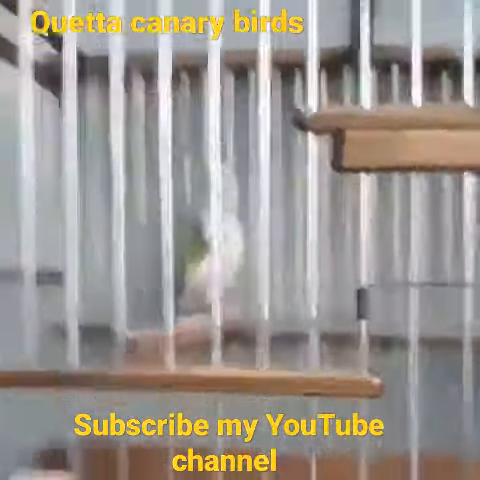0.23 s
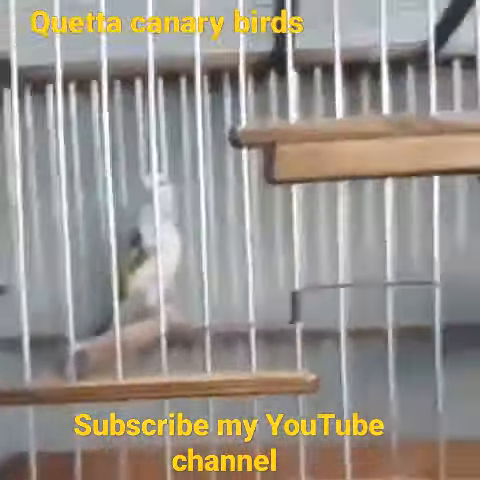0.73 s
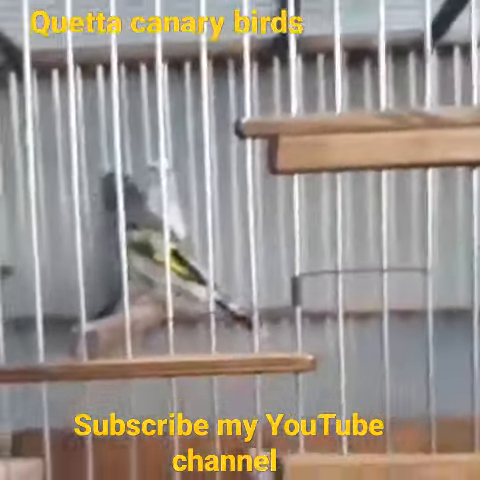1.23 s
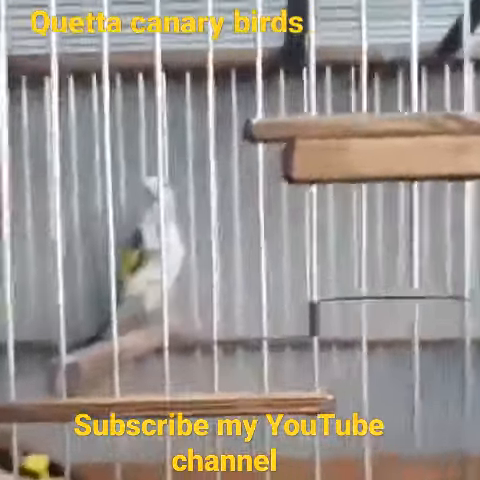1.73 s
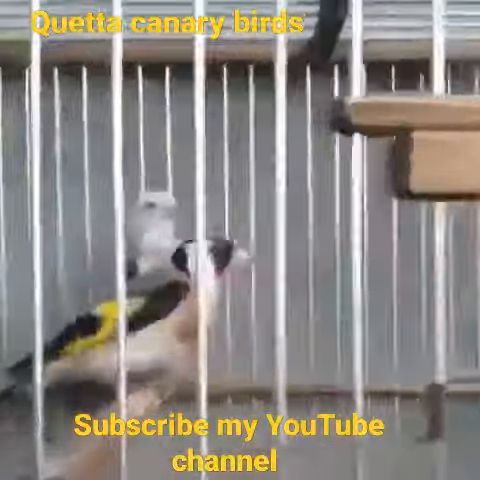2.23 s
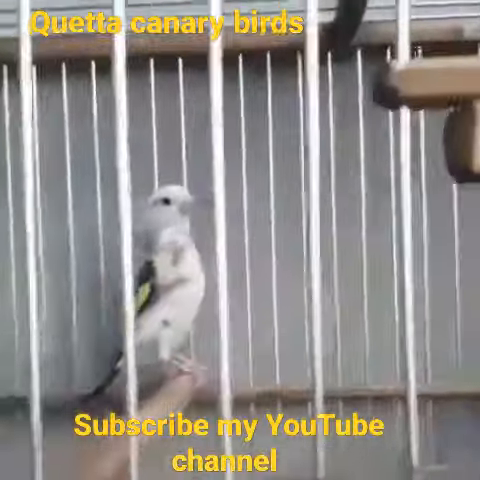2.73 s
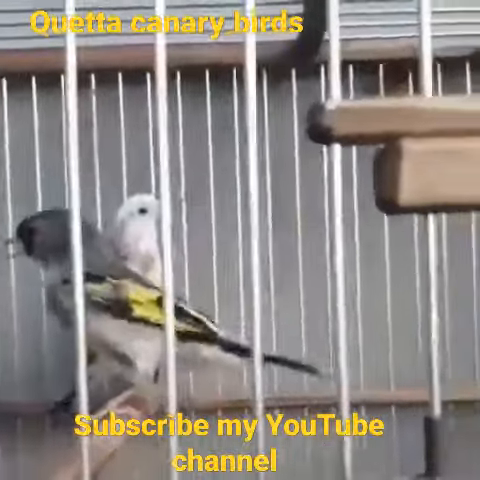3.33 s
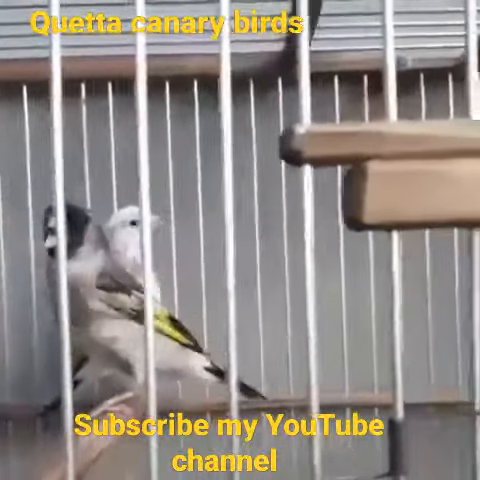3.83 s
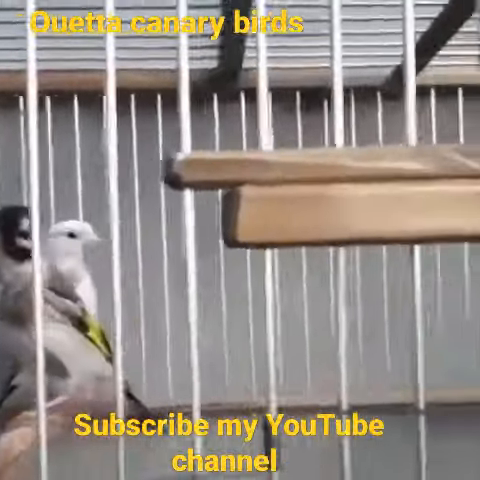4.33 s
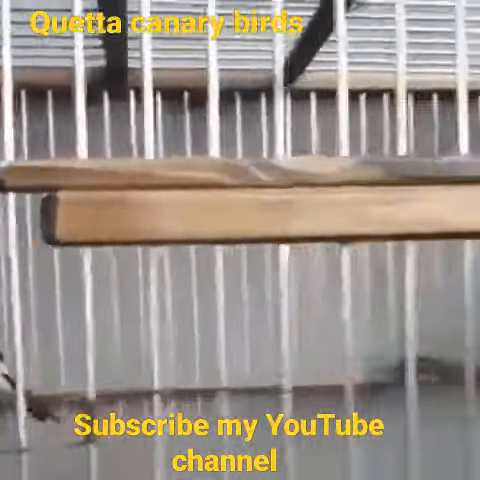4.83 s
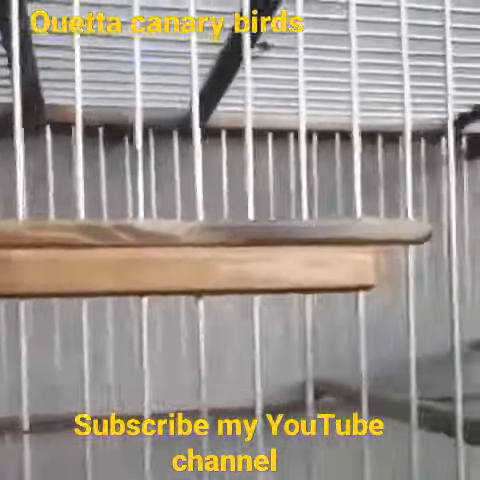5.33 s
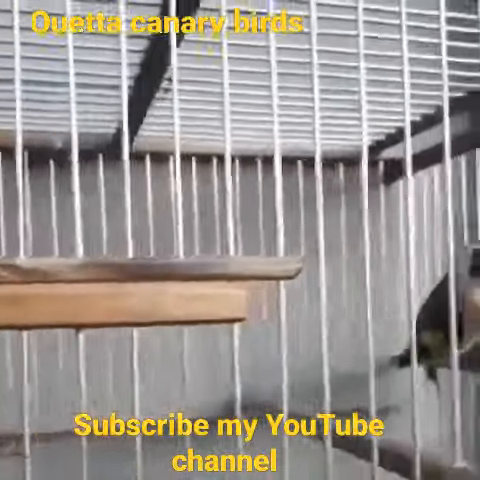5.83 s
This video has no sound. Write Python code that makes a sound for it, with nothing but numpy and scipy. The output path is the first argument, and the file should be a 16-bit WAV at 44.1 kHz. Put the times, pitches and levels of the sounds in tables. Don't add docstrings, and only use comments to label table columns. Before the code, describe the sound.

Sharp, high finch chips amid fluttering feathers, clicking cage wires and small wooden hops, with faint distant bird whistles in a room.

```python
import sys
import numpy as np
from scipy import signal
from scipy.fft import rfft, irfft
from scipy.io import wavfile
from scipy.ndimage import uniform_filter1d

SR = 44100
rng = np.random.default_rng(int(sys.argv[2]) if len(sys.argv) > 2 else 0)


def dump(signal):
    limited = np.clip(np.atleast_2d(signal).T, -1, 1)
    pcm = np.round(limited * 32767).astype(np.int16)
    wavfile.write(sys.argv[1], SR, pcm)


def voltage_ratio(level):
    return 10 ** (np.asarray(level, float) / 20)


N = 268524


def rms_one(x):
    return x / np.sqrt(np.mean(x ** 2) + 1e-20)


def in_time(s, length, rise_s, fall_s):
    corners = [s, s + rise_s, s + rise_s + length, s + rise_s + length + fall_s]
    return np.interp(np.arange(N) / SR, corners, [0, 1, 1, 0])


def coloured(x, points):
    point_hz, point_db = np.transpose(points)
    hz = np.fft.rfftfreq(len(x), 1 / SR) + 1
    gain_db = np.interp(np.log(hz), np.log(point_hz), point_db)
    return irfft(rfft(x) * voltage_ratio(gain_db), len(x))


def band(x, low_hz, high_hz):
    return signal.sosfilt(signal.butter(2, [low_hz, high_hz], "band", fs=SR, output="sos"), x)


def resonate(x, hz, width_hz):
    r = np.exp(-np.pi * width_hz / SR)
    poles = [1, -2 * r * np.cos(2 * np.pi * hz / SR), r * r]
    return signal.lfilter([(1 - r * r) / 2, 0, (r * r - 1) / 2], poles, x)


def drift(rate_hz):
    slow = signal.butter(2, rate_hz, fs=SR, output="sos")
    return rms_one(signal.sosfilt(slow, rng.standard_normal(N)))


def add(out, s, sound):
    at = round(s * SR)
    out[at:at + len(sound)] += sound[:N - at]


def room(x, t60, gap_s, lumpy_db, bend):
    t = np.arange(round(0.7 * SR)) / SR
    level_db = lumpy_db * drift(100.0)[-len(t):] - 60 * (t / t60) ** bend
    tail = rng.standard_normal(len(t)) * voltage_ratio(level_db) * (t > gap_s)
    return signal.fftconvolve(x, tail / np.sqrt(np.sum(tail ** 2)))[:N]


def whistles(rows, share, rough_db, pointed=0.27, bend=0.95):
    out, warble = np.zeros(N), drift(45)
    for s, length, start_hz, end_hz, level_db in rows:
        u = np.linspace(0, 1, round(length * SR))
        hz = end_hz + (start_hz - end_hz) * (1 - u) ** bend
        hz = hz * (1 + share * warble[round(s * SR):][:len(u)])
        swell = np.abs(np.sin(np.pi * u)) ** pointed
        add(out, s, voltage_ratio(level_db) * swell * np.sin(2 * np.pi * np.cumsum(hz) / SR))
    return out * voltage_ratio(rough_db * drift(140))


# frequency in Hz, density in dB per Hz
RUMBLE_SPECTRUM = [(18, -34), (30, -23), (82, -6), (190, -5.5), (543, -6), (667, -10), (1370, -11),
                   (1510, -13.5), (1770, -21.5), (2340, -27.5), (3350, -50.5), (12100, -47), (13700, -52.5)]


def town_rumble():
    noise = rms_one(coloured(rng.standard_normal(N), RUMBLE_SPECTRUM))
    return voltage_ratio(-52.5 - 3.0 + 0.68 * drift(9.4)) * noise


# start in seconds, length in seconds, start Hz, end Hz, level in dB
WHINE = [
    (3.55, 0.68, 141.3, 142, -57),
    (3.85, 0.27, 1430, 1482, -63.5),
    (4.2, 0.36, 1490, 1490, -65.5),
    (4.6, .18, 1495, 1500, -65),
    (4.8, 0.56, 1500, 1512, -60.5),
    (5.5, 0.25, 1518, 1505, -58.5),
    (5.95, .125, 1506, 1490, -62.5),
]


def whine():
    return whistles(WHINE, share=0.002, rough_db=1.2)


# start in seconds, length in seconds, start Hz, end Hz, level in dB
PEEPS = [(.89, 0.011, 2280, 3160, -53), (1.77, 0.02, 2680, 2720, -51), (2.82, 0.026, 2700, 3280, -57.5),
         (2.85, 0.05, 3230, 3140, -67.5), (3.728, 0.029, 2500, 2820, -58), (3.755, 0.11, 2826, 2900, -60.5),
         (3.75, .04, 2480, 2430, -66), (3.885, 0.08, 3037, 3010, -53), (4.065, 0.06, 3080, 3150, -59.5),
         (4.15, 0.099, 3130, 3151, -68.5), (5.351, .03, 2110, 2080, -73.5), (5.405, 0.019, 2150, 1960, -56),
         (5.755, 0.021, 1930, 1760, -55), (5.815, 0.079, 1850, 1834, -61.5)]
# start in seconds, length in seconds, pitch in Hz, level in dB
HOARSE = [
    (0.496, 0.23, 3014, -60),
    (1.425, 0.089, 4100, -74),
    (1.568, 0.078, 3900, -66.5),
    (1.798, 0.063, 4130, -66),
    (1.905, 0.13, 3900, -60),
    (4.248, 0.25, 3960, -70),
    (4.563, 0.5, 4190, -68.5),
]
# start in seconds, start Hz, end Hz, level in dB
CHURRS = [
    (0.455, 2880, 3175, -56),
    (4.551, 4990, 6090, -51),
]
# start in seconds, start Hz, level in dB
STROKES = [(2.321, 3900, -37), (2.352, 3600, -51), (2.4, 3770, -37), (2.426, 3500, -58),
           (4.85, 3700, -66.5), (4.965, 3630, -50.5), (4.99, 3390, -57), (5.054, 4300, -47),
           (5.085, 3900, -51), (5.12, 4130, -67), (5.44, 3400, -62), (5.5, 3790, -46), (5.581, 4330, -41),
           (5.671, 4740, -38), (5.731, 4300, -46.5), (5.778, 4230, -41.5), (5.7, 4205, -49),
           (5.85, 4010, -54)]


def far_birds():
    churr_s, stroke_s, stroke_end_hz = 0.024, 0.014, 2588
    hoarse = [(s, length, hz, hz, db) for s, length, hz, db in HOARSE]
    churrs = [(s, churr_s, *rest) for s, *rest in CHURRS]
    strokes = [(s, stroke_s, hz, stroke_end_hz, db) for s, hz, db in STROKES]
    out = whistles(PEEPS, share=0.006, rough_db=7.5, pointed=0.6)
    out += whistles(hoarse, share=0.033, rough_db=7.5, pointed=0.076)
    out += whistles(churrs, share=0.042, rough_db=9.0)
    return out + whistles(strokes, share=0.029, rough_db=1.2, pointed=0.5, bend=1.2)


# time in seconds, peak in dB
PUFFS = [(0.18, -50), (0.327, -46), (0.538, -51.5), (0.958, -53), (1.699, -46), (1.91, -53), (2.138, -43),
         (2.313, -35), (2.399, -56), (2.536, -42), (2.999, -40), (3.086, -37), (3.149, -40), (3.219, -47),
         (3.396, -40), (3.478, -47), (3.592, -50), (3.767, -58), (3.941, -54.5), (4.494, -59)]


def air_puffs():
    rise_s, t60_s, still_air_db = 0.03, 0.62, -56.5
    t = np.arange(SR // 2) / SR
    power = voltage_ratio(still_air_db) ** 2 * np.ones(N)
    for s, peak_db in PUFFS:
        puff = voltage_ratio(peak_db - 0.5 - 60 * t / t60_s) * np.minimum(t / rise_s, 1)
        add(power, s - rise_s / 2, puff ** 2)
    noise = rms_one(band(rng.standard_normal(N), 56, 160))
    return np.sqrt(power) * voltage_ratio(-5.0 + 1.9 * drift(8.3)) * noise


# start in seconds, length in seconds, feather rustle in dB, fine rustle in dB
BOUTS = [(0, 0.14, -68, -70), (0.103, 0.27, -53.5, -59), (0.226, 0.17, -41, -59), (0.368, 0.11, -44, -67),
         (0.47, 0.14, -40, -54), (0.604, 0.12, -36, -54), (0.7, 0.51, -49.5, -64),
         (1.01, 0.052, -33.5, -49), (1.061, 0.29, -54, -74.5), (1.386, 0.12, -55.5, -68),
         (1.667, 0.092, -49, -70), (1.81, 0.23, -54, -71), (2.099, 0.11, -66, -51),
         (2.198, 0.11, -37.5, -54), (2.302, 0.056, -38, -56), (2.38, 0.073, -44.5, -56),
         (2.467, 0.11, -40, -56), (2.571, 0.036, -40, -47), (2.638, 0.088, -41, -56.5),
         (2.059, 0.74, -53.5, -68), (2.85, 0.098, -58.5, -75), (2.981, 0.3, -44.5, -61),
         (3.29, 0.095, -49.5, -67.5), (3.505, 0.19, -53, -69), (3.853, 0.13, -67.5, -71),
         (4.011, 0.17, -57.5, -81), (4.228, 0.18, -50, -90), (4.44, 0.11, -57, -82),
         (4.792, 0.22, -59, -76), (5.045, 0.093, -67, -73.5), (5.301, 0.25, -82, -79),
         (5.576, 0.31, -55, -74), (5.981, 0.03, -73, -74)]


def stirring():
    rise_s, fall_s = 0.03, 0.054
    power = voltage_ratio([[-67.5], [-80.5]]) ** 2 * np.ones(N)
    for s, length, rustle_db, fine_db in BOUTS:
        shape = in_time(s - rise_s / 2, length - rise_s, rise_s, fall_s)
        power = power + (voltage_ratio([[rustle_db], [fine_db]]) * shape ** 2.7) ** 2
    return 10 * np.log10(power)


# frequency in Hz, density in dB per Hz
FEATHER = [(120, -45), (200, -9.5), (451, -11), (589, -7), (1860, -4), (4050, -13), (5470, -16.5),
           (8670, -16), (12300, -20.5), (13700, -42)]
PATCH_EDGES_HZ = [4600, 6400, 7900, 10100, 11400, 15000]
PATCH_DB = [-1.5, -3.5, 1, -20, 1.5]


def wings():
    rustle_db, fine_db = stirring()
    grains = rng.standard_normal((2, N)) * voltage_ratio(1.5 * drift(25) + 2.5 * drift(500))
    body, fine = (coloured(g, FEATHER) for g in grains)
    rub = voltage_ratio(-7.0 + 2.0 * drift(3.2)) * band(body, 460, 6000)
    wire_shake = voltage_ratio(0.5 + 2.0 * drift(9)) * resonate(body, 3960, 880)
    body = rub + wire_shake
    patches = np.zeros(N)
    for low_hz, high_hz, db in zip(PATCH_EDGES_HZ, PATCH_EDGES_HZ[1:], PATCH_DB):
        patch = band(band(fine, low_hz, high_hz), low_hz, high_hz)
        patches += voltage_ratio(db + 3.46 * drift(11.6)) * patch
    fine = patches * voltage_ratio(1.2 * drift(11.2))
    body_rms = np.std(band(body, 2300, 4800))
    fine_rms = np.std(band(fine, 8300, 13000))
    return voltage_ratio(rustle_db - 12.0) * body / body_rms + voltage_ratio(fine_db - 2.0) * fine / fine_rms


# start in seconds, length in seconds, start Hz, end Hz, level in dB
HUMS = [
    (.708, 0.032, 1424, 1385, -42),
    (2.545, 0.055, 341, 343, -50),
    (2.70, 0.07, 437, 415, -44),
    (2.7, 0.085, 321.6, 327, -52),
    (3.60, 0.1, 339, 301, -52.5),
]


def perch_hums():
    return whistles(HUMS, share=0.027, rough_db=2.5)


# time in seconds, crack in dB, ring in dB, ring pitch in Hz
SNAPS = [(.339, -19.5, -44, 300), (1.135, -44, -37, 740), (1.509, -33, -31.5, 4090),
         (1.541, -48, -44, 4000), (1.683, -40, -31, 1980), (2.118, -37, -43, 3900),
         (2.134, -24, -35.5, 4095), (2.219, -14, -21.5, 4210), (2.245, -25.5, -30.5, 3500),
         (2.486, -33, -32, 3300), (2.490, -34, -32, 2060), (2.498, -28, -33.5, 966),
         (2.547, -38, -35, 3500), (2.678, -31, -36, 1340), (3.008, -27.5, -35.5, 3600),
         (3.079, -35.5, -42, 4000), (3.229, -35, -43, 4100), (3.523, -42, -44, 1150),
         (3.616, -38, -38.5, 4050), (3.868, -53, -47, 2050)]


def snaps():
    out, t = np.zeros(N), np.arange(round(0.08 * SR)) / SR
    crack = band(band((t == 0) * 1.0, 900, 12000), 900, 12000)
    for s, crack_db, ring_db, hz in SNAPS:
        fall_db = 60 * t * np.sqrt(hz * 1000) / 30.0
        ring = voltage_ratio(ring_db - fall_db) * np.sin(2 * np.pi * hz * t)
        add(out, s, voltage_ratio(crack_db - 1) * crack + ring)
    return out


# time in seconds, perch dB, wire dB, feather dB, perch ring in Hz
TICKS = [(.3385, -35, -26.5, -21.5, 435), (1.248, -59, -48, -38, 1380), (1.888, -57, -37.5, -45, 1020),
         (2.118, -56, -31.5, -43, 900), (2.130, -48, -32, -41, 1500), (2.134, -45, -27, -24, 1910),
         (2.168, -49, -33, -36, 1200), (2.177, -42, -27, -37, 806), (2.212, -50, -38, -32, 890),
         (2.219, -50, -19, -22.5, 1210), (2.251, -44, -24, -29, 1200), (2.485, -26, -21.5, -39, 1970),
         (2.556, -51, -36, -40, 1290), (2.663, -47, -46, -39, 1000), (2.678, -36, -45, -45, 1395),
         (3.007, -35, -39, -23.5, 1400), (3.229, -46, -33, -49, 1290)]
# time in seconds, perch dB, wire dB, feather dB, perch ring in Hz
TAPS = [(1.134, -32, -58, -56, 1320), (1.431, -38, -38.5, -46, 730), (1.508, -37, -35, -50, 1476),
        (1.54, -51, -53, -52, 436), (1.682, -29, -36.5, -38, 1920), (1.728, -39, -42.5, -58, 1610),
        (1.861, -43.5, -47, -50, 1070), (1.887, -64, -40, -52.5, 1010), (2.217, -31, -20.5, -28, 447),
        (2.244, -45, -31.5, -30, 1180), (2.36, -43, -39.5, -41.5, 814), (2.474, -37, -34, -34, 1320),
        (2.492, -35, -43, -60, 1933), (2.544, -34.5, -36, -34.5, 2080), (2.597, -45, -37.5, -35.5, 834),
        (2.586, -47, -49, -44.5, 884), (2.745, -48, -50, -58.5, 401), (3.029, -42.5, -52.5, -55.5, 1300),
        (3.127, -39.5, -43.5, -43, 496), (4.13, -42, -43, -55, 418.4), (5.72, -57.5, -51, -50.5, 1007)]
# time in seconds, perch dB, wire dB, feather dB, perch ring in Hz
STEPS = [(1.195, -43.5, -43.5, -48, 1200), (1.247, -46, -63.5, -46, 1380), (1.297, -50, -56, -50, 1090),
         (1.472, -45, -49, -62, 920), (1.698, -37.5, -45, -65, 1090), (1.998, -68, -43.5, -67, 1290),
         (2.014, -53, -76, -65, 530), (2.134, -36.5, -30, -31, 2030), (2.176, -42.5, -44, -38, 506),
         (2.324, -42, -46, -37.5, 610), (3.006, -40.5, -40, -31.5, 1390), (3.077, -43, -40.5, -44, 481),
         (3.227, -47.5, -32, -52.5, 1280), (3.614, -40.5, -46, -32.5, 1046), (3.867, -43, -59.5, -78, 400),
         (3.969, -56, -57, -63, 517)]
# time in seconds, perch dB, wire dB, feather dB, perch ring in Hz
HOPS = [(.242, -48, -41.5, -45, 420), (1.004, -44.5, -44, -49, 1370), (1.127, -37, -36, -39, 1080),
        (1.522, -42, -74, -74, 1005), (1.514, -42, -59, -64, 400), (1.686, -38.5, -44, -61, 1487),
        (2.158, -41.5, -32, -33, 1520), (2.408, -59, -56, -54, 1420), (2.487, -30.5, -37, -65, 1210),
        (2.65, -47.5, -43.5, -43, 970), (2.676, -33.5, -40.5, -59, 1320), (2.709, -46, -47, -43, 406),
        (3.524, -40.5, -46, -43, 1076), (4.828, -63, -57, -64, 1460)]
# time in seconds, perch dB, wire dB, feather dB, perch ring in Hz
FLAPS = [(1.74, -46.5, -55, -60.5, 1100), (2.112, -45, -44, -59, 414), (2.331, -49, -46, -51, 514),
         (2.397, -54, -47, -57, 1320), (4.236, -56, -46.5, -61, 1110), (4.279, -61, -46.5, -72.5, 960),
         (4.44, -47.5, -67, -86, 2105), (4.447, -48, -64, -80, 1060), (5.988, -54.5, -61.5, -73.5, 398)]


def contacts():
    kinds = (TICKS, 0.01), (TAPS, 0.029), (STEPS, 0.045), (HOPS, 0.074), (FLAPS, 0.23)
    return [(*row, t60) for rows, t60 in kinds for row in rows]


# frequency in Hz, width in Hz, level in dB
WIRES = [(2950, 190, -28), (3500, 74, -16), (3900, 530, 5.5), (4300, 170, -0.5), (5950, 360, -4)]


def hops():
    out, wires = np.zeros(N), np.zeros(N)
    t = np.arange(round(0.3 * SR)) / SR
    wood = signal.butter(3, 2300, fs=SR, output="sos")
    hiss_colour = [(3000, -15.5), (5500, -2.0), (9000, 2), (10300, -9.5), (13000, -18.5)]
    for s, perch_db, wire_db, feather_db, ring_hz, t60 in contacts():
        claws = voltage_ratio(rng.standard_normal(len(t) // 44 + 1)).repeat(44)[:len(t)]
        noise = rng.standard_normal((3, len(t))) * claws
        scratch = voltage_ratio(-60 * t / max(t60, 0.005)) * np.minimum(t / (0.12 * t60), 1) ** 1.4
        thud = noise[0] * voltage_ratio(-60 * t / max(3.0 * t60, 0.005)) * np.minimum(t / (0.09 * t60), 1)
        perch = voltage_ratio(13.5) * resonate(thud, ring_hz, 150) + band(thud, 330, 2000)
        perch = signal.sosfilt(wood, perch)
        hiss = coloured(noise[2] * scratch, hiss_colour)
        add(out, s - 0.033 * t60 - 0.001, voltage_ratio(perch_db + 1.5) * perch + voltage_ratio(feather_db + 8.0) * hiss)
        add(wires, s - 0.04 * t60 - 0.001, voltage_ratio(wire_db + 10.0) * noise[1] * scratch)
    jangle = sum(voltage_ratio(db) * resonate(wires, hz, width) for hz, width, db in WIRES)
    return out + snaps() + band(jangle, 2700, 9000)


# pointedness, echo in dB (more when the bird faces away), octave in dB,
# sum tone in dB, abruptness of the start from 0 to 1
CHIP_SHAPE = [
    (0.54, -17.5, -11, -30, .3),
    (1.09, -11.5, -21, -13.5, 0.07),
    (1.13, -25.5, -39, -36, 0),
    (1.15, -25.5, -17, -32, 0.05),
    (1.5, -28.5, -19, -27, 0.17),
    (0.79, -25, -37, -38.5, 0.2),
]


def voice(rows, notches_hz, snap):
    glide_s = 0.012
    pure, heard, gains = np.zeros(N, complex), np.zeros(N, complex), np.zeros((3, N))
    for row, notch_hz, shape in zip(rows, notches_hz, CHIP_SHAPE):
        s, length, start_hz, rest_hz, peak_db = row
        pointed, *gains_db, abrupt = shape
        t = np.arange(round(length * SR)) / SR
        hz = rest_hz + (start_hz - rest_hz) * np.exp(-t / glide_s)
        head_start = snap * abrupt
        through = head_start + (1 - head_start) * (t / length) ** (0.5 + 0.48 * pointed)
        swell = np.abs(np.sin(np.pi * through)) ** pointed * np.minimum(t / 0.0017, 1)
        tone = voltage_ratio(peak_db) * swell * np.exp(2j * np.pi * np.cumsum(hz) / SR)
        dip = 1 - 0.9 * np.exp(-((hz - notch_hz) / 90) ** 2)
        add(pure, s, tone)
        add(heard, s, tone * dip)
        for gain, db in zip(gains, gains_db):
            add(gain, s, np.full(len(t), voltage_ratio(db)))
    return pure, heard * voltage_ratio(1.2 * drift(170)), gains


# start in seconds, length in seconds, start Hz, resting Hz, peak in dB
LOW_VOICE = [
    (0.173, 0.026, 6200, 5680, -31.5),
    (.287, 0.033, 6070, 5000, -25),
    (1.010, 0.032, 6680, 5630, -18.5),
    (2.413, 0.035, 6380, 5670, -24),
    (3.155, 0.032, 6470, 5580, -14.5),
    (3.334, 0.041, 6260, 5190, -17),
]


def by_chip(levels_db):
    starts = np.array(LOW_VOICE)[1:, 0] - 0.002
    return voltage_ratio(np.array(levels_db)[np.searchsorted(starts, np.arange(N) / SR)])


# start in seconds, length in seconds, start Hz, resting Hz, peak in dB
HIGH_VOICE = [
    (.176, 0.023, 8020, 6500, -28.5),
    (.291, 0.033, 7680, 6180, -24),
    (1.016, 0.023, 8360, 6480, -11.5),
    (2.418, 0.025, 7870, 6620, -13.5),
    (3.161, 0.027, 8120, 6460, -7.5),
    (3.337, 0.04, 7740, 6244, -7.5),
]
LOW_NOTCH_HZ = [6040, 5260, 4500, 4500, 6067, 4430]
HIGH_NOTCH_HZ = [7070, 6760, 9500, 6960, 9500, 6710]
EARLY_DB = [0, -7, 2.5, -1.5, 2.3, -2]


def chips():
    low, low_heard, (low_wet, octave, summed) = voice(LOW_VOICE, LOW_NOTCH_HZ, snap=0.15)
    high, high_heard, (high_wet, _, _) = voice(HIGH_VOICE, HIGH_NOTCH_HZ, snap=0.62)
    power = abs(low) ** 2 + abs(high) ** 2 + 1e-9
    above = voltage_ratio(-21.0 + 2.48 * drift(199.9)) * high ** 2 * low.conj() / power
    below = voltage_ratio(-23.5 + 3.67 * drift(400)) * low ** 2 * high.conj() / power
    octave_tone = octave * low ** 2 / (abs(low) + 1e-5) * voltage_ratio(-6.0)
    sum_tone = summed * low * high / np.sqrt(power)
    sides = above + below + (octave_tone + sum_tone) * voltage_ratio(4.6 * drift(150))
    into_room = (low * low_wet + (high + sides) * high_wet).real
    perch_echoes = room(into_room * by_chip(EARLY_DB), 0.095, gap_s=0.005, lumpy_db=4.0, bend=1.05)
    room_echo = room(into_room, 0.39, gap_s=0.043, lumpy_db=3.5, bend=0.8)
    return (low_heard + high_heard + sides).real + voltage_ratio(7.5) * perch_echoes + room_echo


RASP_DB = [-38, -42.5, -41.5, -40, -42, -38.5]


def rasp(near):
    loudness = np.sqrt(uniform_filter1d(near ** 2, size=200) + 1e-12)
    noise, patches = rng.standard_normal(N), np.zeros(N)
    for hz, db in [(9450, -1.5), (10900, -1.506), (12300, 0.1)]:
        patches += voltage_ratio(db) * resonate(resonate(noise, hz, 450), hz, 450)
    hiss = by_chip(RASP_DB) * loudness * rms_one(patches) * voltage_ratio(3.5)
    return hiss + voltage_ratio(-10.5) * room(hiss, 0.2, gap_s=0.004, lumpy_db=2.0, bend=1.1)


# frequency in Hz, side minus mid in dB
WIDTH = [(300, -43.5), (700, -39), (1700, -39.5), (2500, -36), (3900, -31), (4700, -7), (5800, -1),
         (8800, -2), (13000, -1.5)]
# start in seconds, length in seconds
ALIKE = [(.12, .04), (1.05, .04), (1.44, .04), (2.085, .04), (3.13, .02), (3.275, .05), (3.585, .02)]


def spread(x):
    smear = rfft(rng.standard_normal(900) * voltage_ratio(-np.arange(900) / 60), N)
    smeared = coloured(irfft(rfft(x) * smear / abs(smear), N), WIDTH)
    edges, whole = [300, *PATCH_EDGES_HZ[1:]], drift(9.9)
    side = np.zeros(N)
    for low_hz, high_hz in zip(edges, edges[1:]):
        side += np.clip(4 * (whole + drift(14) + 1.2), 0.02, 1) * band(smeared, low_hz, high_hz)
    return side * (1 - sum(in_time(s, length, 0.006, 0.006) for s, length in ALIKE))


def scene():
    far, cage, near = far_birds(), hops(), chips()
    around = town_rumble() + whine() + air_puffs() + wings() + perch_hums()
    around += voltage_ratio(-9) * far + voltage_ratio(-3) * room(far, 0.13, gap_s=0.002, lumpy_db=1.5, bend=1.0)
    around += voltage_ratio(-2.5) * room(far, 0.42, gap_s=0.01, lumpy_db=1.2, bend=1.3)
    around += cage + voltage_ratio(-9.5) * room(cage, 0.087, gap_s=0.004, lumpy_db=11.0, bend=0.71)
    near = near + rasp(near)
    near_treble = band(band(near, 8200, 14000), 8200, 14000)
    side = spread(around + voltage_ratio(-31.5) * near + voltage_ratio(-9.5) * near_treble)
    return np.array([near + around + side, near + around - side])


def roll_off(x):
    return signal.sosfilt(signal.butter(12, 13880, fs=SR, output="sos"), x)


def record(dry):
    steep = signal.ellip(10, 0.5, 60, 13350, fs=SR, output="sos")
    mix = signal.sosfilt(steep, dry)
    return roll_off(mix)


dry = scene()
out = record(dry)
dump(out)
```